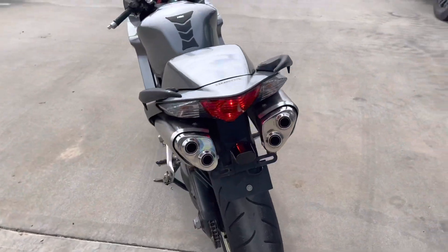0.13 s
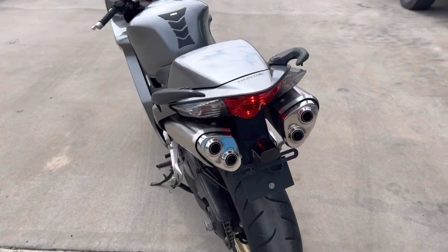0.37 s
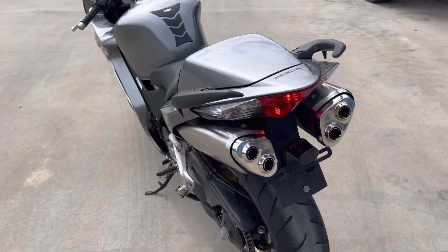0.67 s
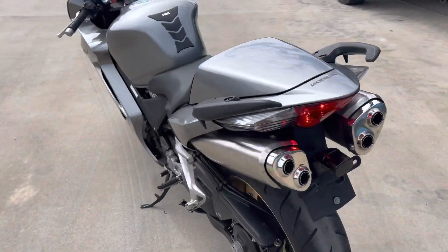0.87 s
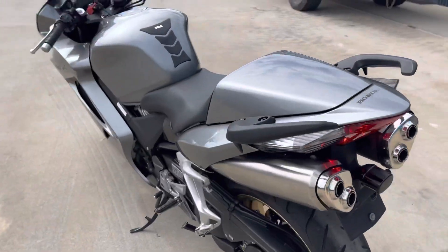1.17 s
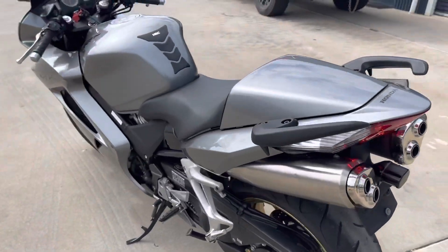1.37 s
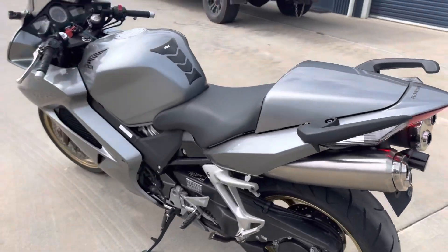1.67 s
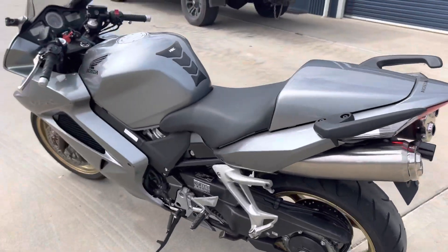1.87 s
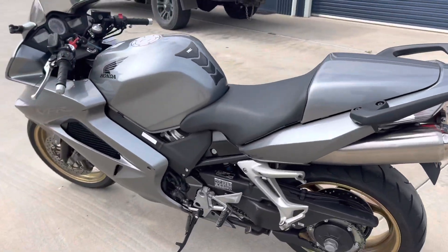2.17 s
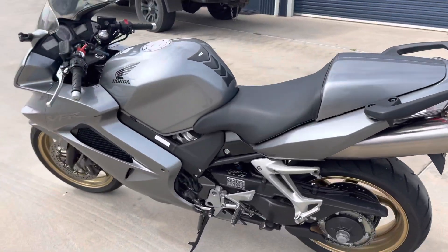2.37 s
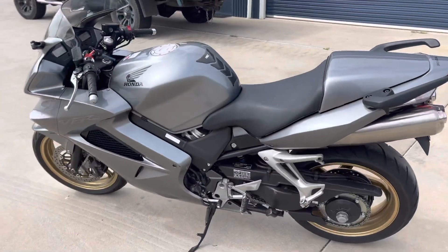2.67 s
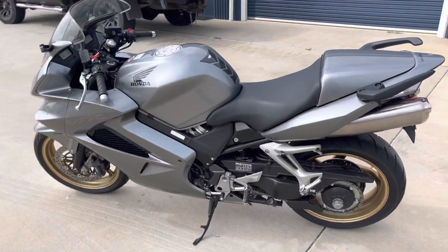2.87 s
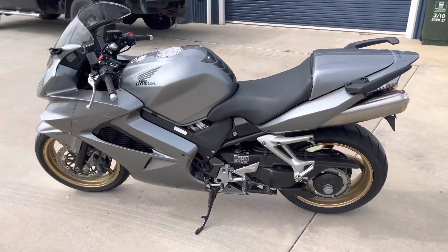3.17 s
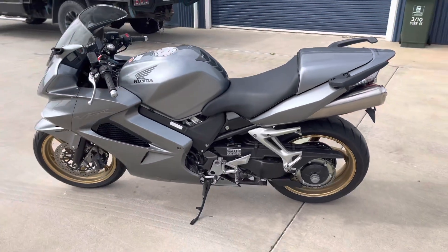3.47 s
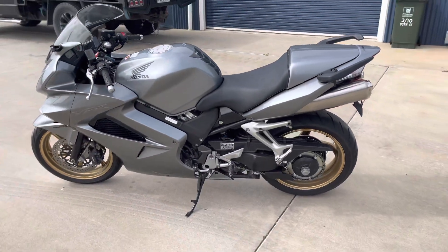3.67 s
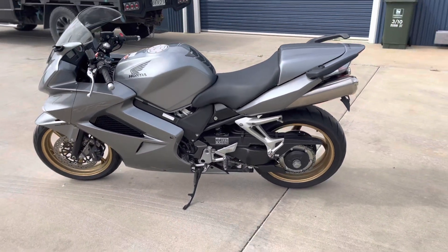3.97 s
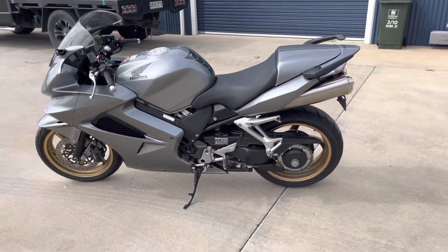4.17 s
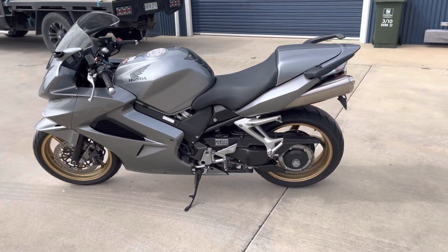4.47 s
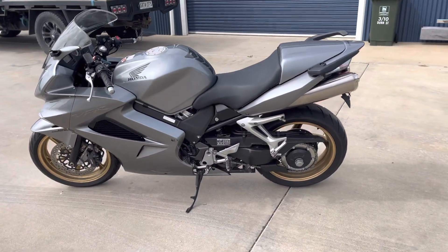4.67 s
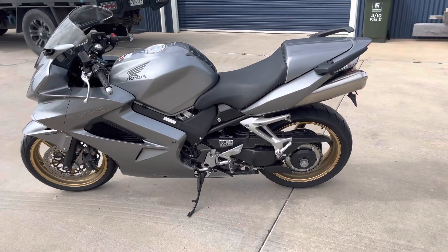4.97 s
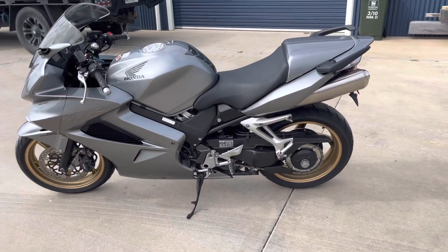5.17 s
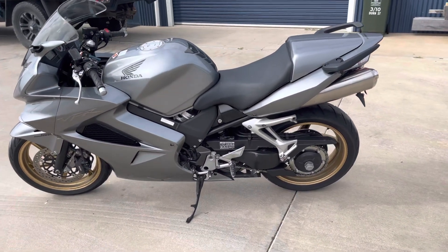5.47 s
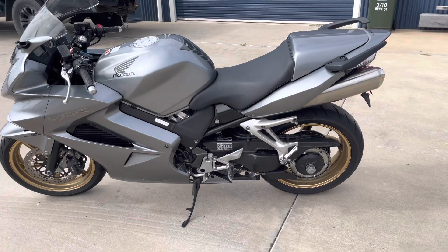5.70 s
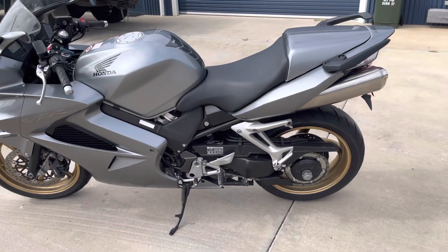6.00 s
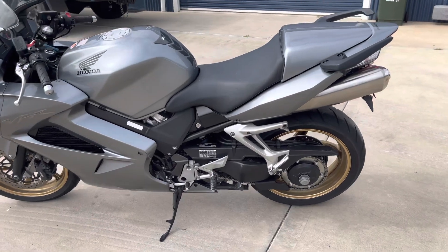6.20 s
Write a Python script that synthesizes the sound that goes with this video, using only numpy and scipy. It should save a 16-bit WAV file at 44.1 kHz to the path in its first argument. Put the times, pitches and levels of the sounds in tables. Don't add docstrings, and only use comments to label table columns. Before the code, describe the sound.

Wind thumps the microphone at once over a deep, pulsing motorcycle exhaust. As the listener walks round to the engine's side, the boom eases slightly and dry rattling, hollow case knocks and thin ticking come forward. Strong buffets return between one and a half and just over two seconds; afterwards the idle stays exposed, with occasional soft gusts and short reflections from concrete.

```python
import sys
import numpy as np
from scipy import signal
from scipy.fft import rfft, irfft, next_fast_len
from scipy.io import wavfile
from scipy.ndimage import uniform_filter1d

SR = 44100
rng = np.random.default_rng(int(sys.argv[2]) if len(sys.argv) > 2 else 0)


def to_linear_factor(level_db):
    exponent = np.asarray(level_db, float) / 20
    return 10 ** exponent


def master_out(mix):
    frames = np.transpose(np.atleast_2d(mix))
    ceiling = np.clip(frames, -1, 1)
    pcm = np.round(ceiling * 32767).astype(np.int16)
    wavfile.write(sys.argv[1], SR, pcm)


N = 279594

# [f/Hz, level/dB]
GUST_SPECTRUM = [(25, -29), (40, 9), (65, 0), (110, 6), (160, 0.5), (230, -7.5), (320, -13), (480, -27),
                 (800, -27.5), (1500, -37), (3000, -99)]
# [f/Hz, level/dB]
EDDY_SPECTRUM = [(25, -20), (40, -8), (65, -1.5), (110, 1), (160, -9), (230, -14), (320, -29), (480, -32),
                 (800, -38), (1500, -47), (3000, -90)]
# [f/Hz, level/dB]
RUSH_SPECTRUM = [(100, -22), (250, 5), (400, -5), (600, -13.5), (900, -35), (1500, -53), (3000, -95)]
# [t/s, half length/s, level alike on both ports/dB, level of opposed eddies/dB]
GUSTS = [(0, 0.13, -18.5, -21), (0.25, 0.096, -17.5, -25), (0.84, 0.93, -23, -45), (0.864, 0.05, -32, -59),
         (1.18, .07, -38, -38), (1.34, 0.084, -53, -24), (1.658, 0.15, -15, -25),
         (1.828, 0.037, -17.5, -33), (1.946, 0.045, -23, -40), (2.202, .11, -19.5, -28),
         (2.9, 0.27, -35, -40), (3.277, .12, -25.5, -47), (3.614, 0.092, -31, -49),
         (3.89, 0.21, -32.5, -68), (4.338, 0.26, -25, -36), (4.656, 0.062, -26.5, -42),
         (4.915, 0.054, -25, -41), (5.24, 0.24, -31.5, -46), (5.506, 0.14, -32.5, -47),
         (5.82, 0.17, -24.5, -30), (6.087, 0.26, -24, -33)]
# [t/s, peak level/dB, f/Hz]
BUFFETS = [(0.014, -5.5, 160), (.096, -11, 203), (0.172, -7, 239), (0.214, -10, 205), (0.238, -8, 192),
           (0.26, -11.5, 260), (0.31, -6.5, 169), (.38, -15, 191), (1.518, -21, 146), (1.588, 0.5, 172),
           (1.642, -12, 222), (1.68, -3.5, 212), (1.708, -5.5, 178), (1.826, 0.5, 139), (2.13, -30, 152),
           (2.184, -10, 148), (2.203, 4, 197), (2.245, -9.5, 242), (2.325, -23, 211), (3.278, -24, 154),
           (4.21, -10.5, 128), (4.368, -39, 162), (5.797, -18, 165), (5.87, -14, 144), (5.918, -27, 141),
           (6.034, -14, 162)]
# [t/s, sudden loss/dB,
# recovery/s]
LEVEL_DROPS = [
    (2.2, 17, 0.046),
    (2.225, -7, 0.05),
    (0.22, -2, 0.046),
]
# [t/s, loss/dB, release/s]
WIND_GUARD = [
    (1.855, 6, 0.36),
    (2.228, 9, 0.34),
]
# [f/Hz, likeness/0-1]
PORT_LIKENESS = [(60, .98), (250, .86), (520, .93), (1060, .77), (2170, .7), (4440, .72), (6500, .82),
                 (9100, .93), (11000, .99)]
# [f/Hz, lead/rad]
LEFT_LEAD = [(0, 0), (1720, 0.2), (4570, 0.8), (5170, 1.3), (6630, -0.2), (7580, 1.0), (8870, -0.2),
             (9300, -1.4)]
# [f/Hz, left minus right level/dB]
LEFT_LEAN = [(60, 4.5), (320, 1), (740, 2), (1500, 4), (2800, 2), (5500, 3.5), (8500, 2), (12000, 1)]
# [t/s, distance/m, share of engine in view/0-1]
WALK = [(0, 1.69, 0.12), (.5, 1.72, 0.67), (1, 1.49, 0.82), (1.5, 1.41, 0.85), (2, 1.26, 0.9),
        (2.5, 1.38, 0.97), (3, 1.59, 1), (3.5, 1.65, 0.93), (4.2, 1.79, 0.92), (5, 1.62, 0.93),
        (5.6, 1.6, 0.89), (6.34, 1.42, 1)]
# f/Hz, width/Hz, share
FLOOR_DIP = (515, 81, 0.42)
# [t/s, crankshaft speed/rpm]
IDLE_SPEED = [(0.0, 1309.3), (0.58, 1311.7), (1.15, 1339.3), (1.73, 1321.6), (2.31, 1296.0), (2.88, 1297.2),
              (3.46, 1347.2), (4.03, 1310.7), (4.61, 1301.1), (5.19, 1340.6), (5.76, 1351.7),
              (6.34, 1318.7)]
START_CYCLE = 0.083
# [crank angle/deg, level/dB, next cycle's angle/deg, next cycle's level/dB]
FIRING_ORDER = [
    (505, 0, 515, -.2),
    (664, -9.1, 687, -2.9),
    (777, -2.5, 779, -5.6),
    (950, -2.7, 950, -.9),
]
# [t/s, unevenness]
UNEVENNESS = [(0, -1.2), (2.15, -1.3), (2.4, 0), (2.7, .1), (2.9, 1.2), (3.8, 1), (5.6, 1.05), (5.9, 1.5),
              (6.34, 1.3)]
# [f/Hz, width/Hz, level/dB]
CASE_MODES = [(677, 21.4, -2.5), (1028, 46, -7), (1278, 280, -1), (404.6, 76, -4.5), (1958, 37, -12),
              (2227, 190, -11.5)]
# [t/s, half length/s, level/dB]
COVER_BEAMS = [
    (1.45, 0.18, -45.5),
    (2.3, 0.21, -46),
    (3.6, 0.48, -50.5),
    (5.0, 0.32, -61),
    (5.65, 0.49, -49),
]
# [f/Hz, width/Hz, level/dB]
VALVE_MODES = [(7470, 440, -1), (8190, 180, -4), (6530, 370, -8.5), (8990, 950, -8.5), (3360, 660, -7.5)]
# [place in the cycle/0-1, level/dB]
VALVE_SEATS = [
    (0.768, 0.5),
    (0.286, -3.5),
    (0.034, 3),
    (0.67, 6),
]
# [f/Hz, level/dB]
RATTLE_SPECTRUM = [(120, -2), (250, -7), (500, -6), (900, -7.5), (1500, -10.5), (2600, -13.5),
                   (5000, -15.5), (7000, -17), (8000, -11.5), (9300, -24), (10200, -52.5), (11300, -28),
                   (12500, -63), (15500, -50)]
# [f/Hz, width/Hz, signed share]
SILENCER = [
    (57.1, 14.5, 1),
    (73.1, 8, -1.45),
]
# [t/s, level/dB]
BOOM_LEVEL = [(0, -15.5), (.3, -18), (.9, -16), (1.5, -16), (1.84, -18), (2.7, -20.5), (3.3, -19.5),
              (4.1, -20.5), (5.0, -19.5), (5.9, -20), (6.34, -18.5)]


def evened(x):
    return x / np.sqrt(np.mean(x ** 2) + 1e-20)


def read(points, hz):
    f, value = np.transpose(points)
    return np.interp(np.log(hz + 1), np.log(f + 1), value)


def curves(rows, t):
    s, *columns = np.transpose(rows)
    return [np.interp(t, s, column) for column in columns]


def bumps(t, middles, halves, levels_db):
    return sum(to_linear_factor(db) * np.exp(-((t - s) / half) ** 2) for s, half, db in zip(middles, halves, levels_db))


def coloured(x, gain):
    size = next_fast_len(N + SR)
    return irfft(rfft(x, size) * gain(np.fft.rfftfreq(size, 1 / SR)), size)[..., :N]


def above(x, edge_hz):
    return coloured(x, lambda hz: 1 - 1 / (1 + (hz / edge_hz) ** 12))


def lumps(top_hz):
    count = N // 220 + 2
    hz = np.fft.rfftfreq(count, 220 / SR)
    slow = irfft(rfft(rng.standard_normal(count)) / (1 + (hz / top_hz) ** 4), count)
    return np.interp(np.arange(N) / 220, np.arange(count), evened(slow))


def turbulence(spectrum, depth_db):
    noise = rng.standard_normal(N) * to_linear_factor(depth_db * lumps(55))
    return evened(coloured(noise, lambda hz: to_linear_factor(read(spectrum, hz))))


def buffets():
    u = np.arange(3000) / SR
    swell = lambda seconds: (u / seconds) ** 2 * np.exp(2 - 2 * u / seconds)
    pushes, rush = np.zeros((2, N + len(u)))
    for s, db, hz in BUFFETS:
        start = round(s * SR)
        at = slice(start, start + len(u))
        pushes[at] += to_linear_factor(db - 12.5) * np.sin(2 * np.pi * hz * u * (1 + 15 * u)) * swell(0.0067)
        rush[at] += to_linear_factor(db - 14) * swell(0.0075)
    return pushes[:N], rush[:N]


def wind(t):
    middle, half, both_db, one_db = np.transpose(GUSTS)
    loss_db = sum(db * (t > s) * np.exp(-abs(t - s) / back) for s, db, back in LEVEL_DROPS)
    drop = to_linear_factor(-uniform_filter1d(loss_db, size=600))
    pushes, rush = buffets()
    breeze = to_linear_factor(-45) + bumps(t, middle, half, both_db - 3.0)
    both = breeze * turbulence(GUST_SPECTRUM, depth_db=3.0) + pushes
    both = both + rush * turbulence(RUSH_SPECTRUM, depth_db=4.5)
    both = coloured(both, lambda hz: 1 - 1 / (1 + (hz / 46) ** 4))
    eddy = to_linear_factor(-44.5) + bumps(t, middle, half, one_db - 3.5)
    one = eddy * turbulence(EDDY_SPECTRUM, depth_db=2.0)
    one = one + to_linear_factor(-7.0) * rush * turbulence(RUSH_SPECTRUM, depth_db=-8.0)
    return drop * np.array([both + one, both - one])


def yard(x):
    taps = rng.standard_normal((2, 2, 6000)) * to_linear_factor(-60 * np.arange(6000) / SR / 0.1)
    turn = 2 * np.pi * 0.326 * np.arange(N) / SR
    fed = x * np.array([np.cos(turn), np.sin(turn)])
    return signal.oaconvolve(fed[:, None], taps / np.linalg.norm(taps[0, 0]), axes=2).sum(0)[:, :N]


def ports(x, pan_db):
    same = lambda hz: np.clip(read(PORT_LIKENESS, hz), 0, 1)
    lead = lambda hz: np.exp([[.5j], [-.5j]] * read(LEFT_LEAD, hz))
    direct = coloured(x, lambda hz: np.sqrt(same(hz)) * lead(hz))
    scattered = coloured(yard(x), lambda hz: np.sqrt(1 - same(hz)))
    leaning = coloured(direct + scattered, lambda hz: to_linear_factor([[.5], [-.5]] * read(LEFT_LEAN, hz)))
    return leaning * to_linear_factor([pan_db / 2, -pan_db / 2])


def crank():
    at = np.arange(-SR // 5, N)
    turned = np.cumsum(curves(IDLE_SPEED, at / SR)[0]) / (120 * SR)
    return at, turned - turned[SR // 5] + START_CYCLE


def train(cycles, sizes):
    sample, turned = crank()
    at = np.interp(cycles, turned, sample).astype(int)
    size = next_fast_len(N + SR)
    return np.bincount(at % size, sizes * (at < N - 1), size)


def firings(scatter_db, scatter_deg):
    cycle = np.arange(-2, 72)[:, None]
    deg, db, next_deg, next_db = np.transpose(FIRING_ORDER)
    sample, turned = crank()
    seconds = np.interp(cycle + 1, turned, sample) / SR
    uneven = curves(UNEVENNESS, seconds)[0] * (-1.) ** cycle
    luck = rng.standard_normal((len(cycle), 4, 2))
    angle = (deg + next_deg) / 2 + uneven * (deg - next_deg) / 2 + scatter_deg * luck[..., 0]
    size = (to_linear_factor(db) + to_linear_factor(next_db)) / 2 + uneven * (to_linear_factor(db) - to_linear_factor(next_db)) / 2
    size = size * to_linear_factor(scatter_db * luck[..., 1])
    return train((cycle + angle / 720).ravel(), size.ravel())


def puffed(clicks, seconds, steady):
    r = np.exp(-1 / (seconds * SR))
    swell = signal.lfilter([1], [1, -2 * r, r * r], abs(clicks[:N]))
    return (steady + evened(swell)) * rng.standard_normal(N)


def resonate(x, hz, width):
    turn = np.exp(2j * np.pi * np.cumsum(hz * np.ones(N)) / SR)
    r = np.exp(-np.pi * width / SR)
    return evened((turn * signal.lfilter([1], [1, -2 * r, r * r], x / turn)).real)


def struck(clicks, table, seconds, steady, scatter_db, waver_db):
    out, at = np.zeros(N), np.flatnonzero(clicks[:N])
    for hz, width, db in table:
        luck = rng.standard_normal(400)[:len(at)]
        share = np.bincount(at, clicks[at] * to_linear_factor(scatter_db * luck), N)
        out += to_linear_factor(db + waver_db * lumps(0.86)) * resonate(puffed(share, seconds, steady), hz, width)
    return evened(out)


def gear_rattle(blows, seats, tick_db):
    shaken = puffed(blows + seats, 0.0013, 14.0) * to_linear_factor(0.7 * lumps(33))
    rattle = evened(coloured(shaken, lambda hz: to_linear_factor(read(RATTLE_SPECTRUM, hz))))
    return rattle + above(rattle, 2850) * (to_linear_factor(.5 * (tick_db - tick_db.mean())) - 1)


def valve_seats():
    place, db = np.transpose(VALVE_SEATS)
    cycle = np.arange(72)[:, None] + place + 0.016 * rng.standard_normal((72, len(VALVE_SEATS)))
    return train(cycle.ravel(), np.tile(to_linear_factor(db), 72))


def case_knock(t, blows, near_db, hidden):
    ring_hz = 795.5 - 69 * np.exp(-((t - 2.05) / 0.5) ** 2)
    ring = struck(blows, [(ring_hz, 150, 0)], seconds=.003, steady=.9, scatter_db=1.5, waver_db=.5)
    cover = struck(blows, [(1678, 105, 0)], seconds=.004, steady=.8, scatter_db=2.5, waver_db=.5)
    cases = struck(blows, CASE_MODES, seconds=.0052, steady=.95, scatter_db=3.0, waver_db=1.5)
    frame_db = 7.5 * np.exp(-((t - 2.55) / 0.22) ** 2)
    ring_db = -35 + near_db - 8 * hidden ** 2 - frame_db
    cover_gain = to_linear_factor(-54.5) + bumps(t, *np.transpose(COVER_BEAMS))
    return to_linear_factor(ring_db) * ring + to_linear_factor(-38 + near_db) * cases + cover_gain * cover


def floor_echo(t, x):
    dip_hz, width, share = FLOOR_DIP
    side_on = 1 / (1 + np.exp((2 - t) / 0.27))
    return x - share * side_on * coloured(x, lambda hz: np.exp(-((hz - dip_hz) / width) ** 2))


def machine(t):
    metres, view = curves(WALK, t)
    near_db, hidden = -20 * np.log10(metres), np.clip(1 - view, 0, 1)
    tick_db = -38 + near_db - 9 * hidden
    blows, seats = firings(scatter_db=1.0, scatter_deg=19), valve_seats()
    ticks = struck(seats, VALVE_MODES, seconds=.0041, steady=.91, scatter_db=5.5, waver_db=1.5)
    whole = case_knock(t, blows, near_db, hidden) + to_linear_factor(tick_db) * ticks
    whole = whole + to_linear_factor(-30.5 + near_db) * gear_rattle(blows, seats, tick_db)
    whole = floor_echo(t, whole)
    whole = whole + above(whole, 8900) * (to_linear_factor(3.2 * lumps(4) - 1.5) - 1)
    return whole, -0.8 + 1.1 * hidden


def modes(hz, table):
    return sum(g * w * 1j * hz / (f ** 2 - hz ** 2 + 1j * w * hz) for f, w, g in table)


def ringing(x, table):
    rows = [(f, w, (-1) ** k * to_linear_factor(db)) for k, (f, w, db) in enumerate(table)]
    return evened(coloured(x, lambda hz: modes(hz, rows)))


def silencer(hz):
    low_cut = (1j * hz / (1j * hz + 71.4)) ** 4
    return modes(hz, SILENCER) * low_cut / (1 + (hz / 135) ** 8)


def exhaust(t):
    pulses = firings(scatter_db=.7, scatter_deg=2.5)
    boom = evened(coloured(pulses, silencer))
    bark = ringing(pulses, [(121.3, 15, 5.0), (165.3, 36.0, 3), (260, 210, -67.0)])
    bark = coloured(bark, lambda hz: 1 / (1 + (hz / 330) ** 6))
    guard_db = sum(db * (t > s) * np.exp(-(abs(t - s) / back) ** 3) for s, db, back in WIND_GUARD)
    guard_db = uniform_filter1d(uniform_filter1d(guard_db, size=500), size=500)
    return to_linear_factor(curves(BOOM_LEVEL, t)[0] - guard_db + 2.0) * (boom + to_linear_factor(-20.5) * bark)


def scene():
    t = np.arange(N) / SR
    return exhaust(t) + ports(*machine(t)) + wind(t)


def low_pass(x):
    return signal.sosfilt(signal.butter(12, 15700, fs=SR, output="sos"), x)


def record(dry):
    mix = coloured(dry, lambda hz: 1 - 1 / (1 + (hz / 24) ** 4))
    return low_pass(mix)


dry = scene()
out = record(dry)
master_out(out)
```